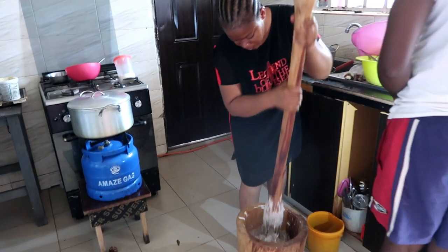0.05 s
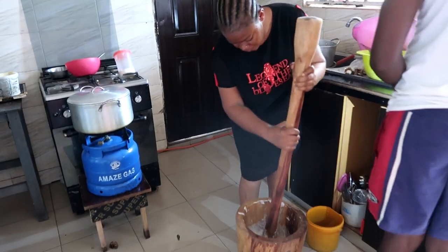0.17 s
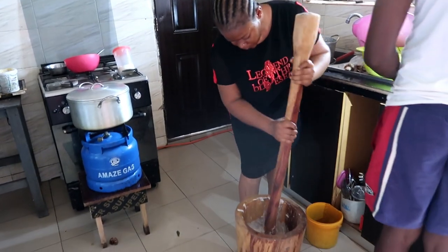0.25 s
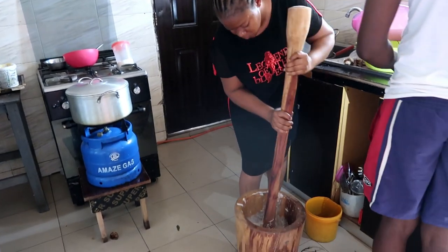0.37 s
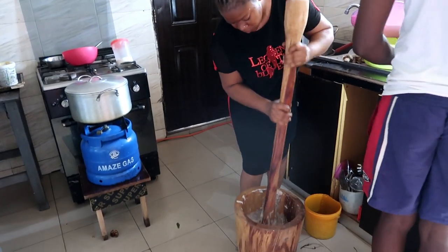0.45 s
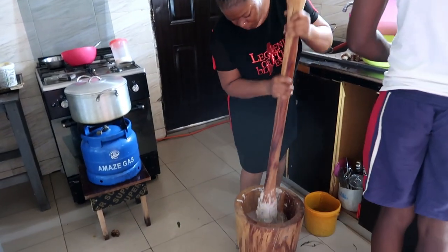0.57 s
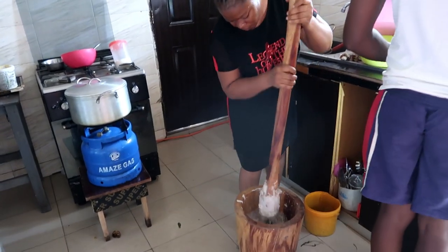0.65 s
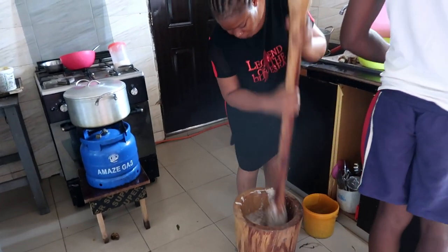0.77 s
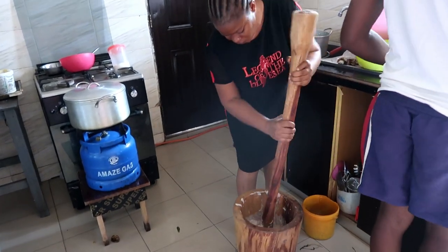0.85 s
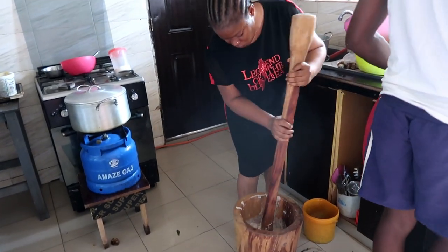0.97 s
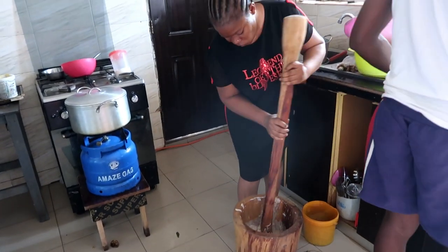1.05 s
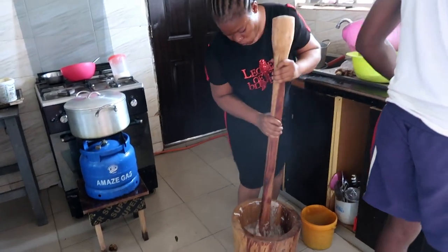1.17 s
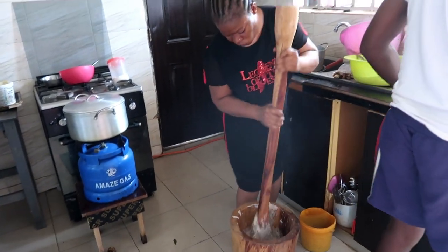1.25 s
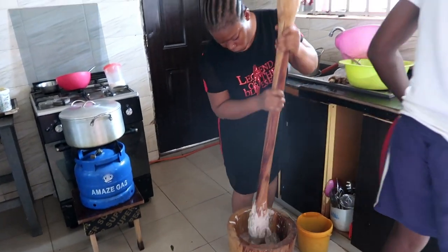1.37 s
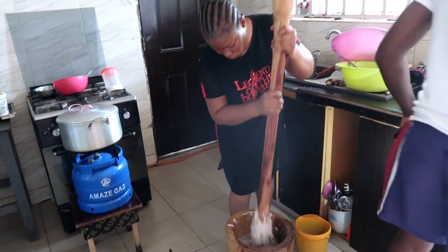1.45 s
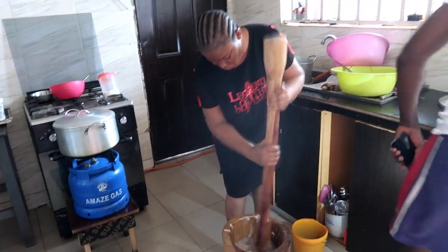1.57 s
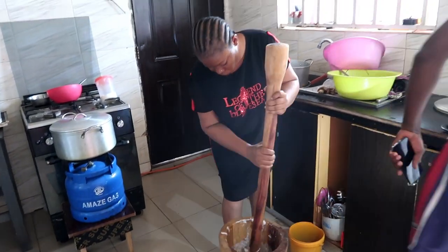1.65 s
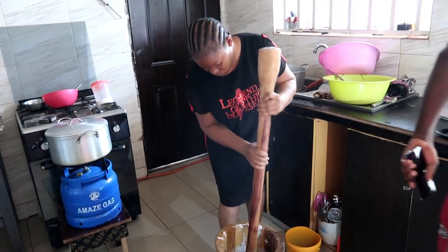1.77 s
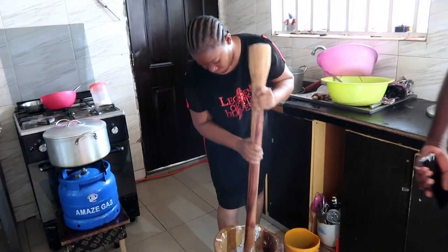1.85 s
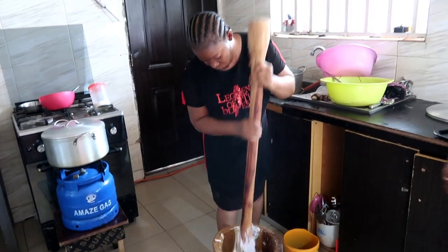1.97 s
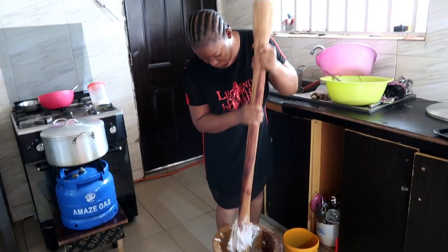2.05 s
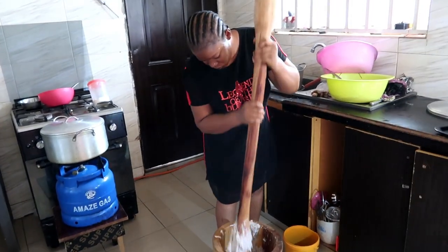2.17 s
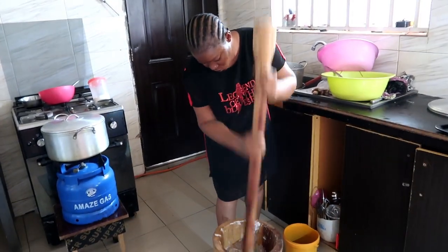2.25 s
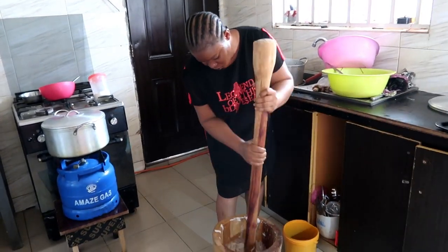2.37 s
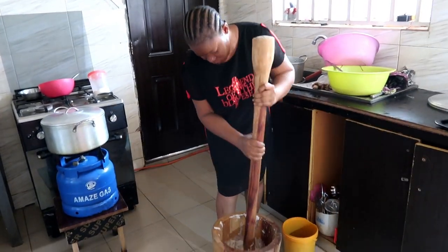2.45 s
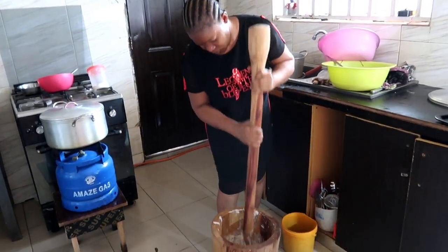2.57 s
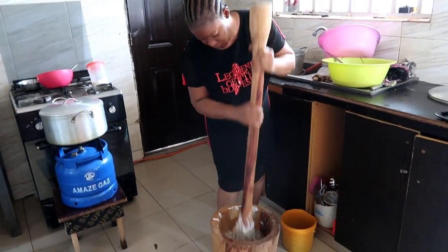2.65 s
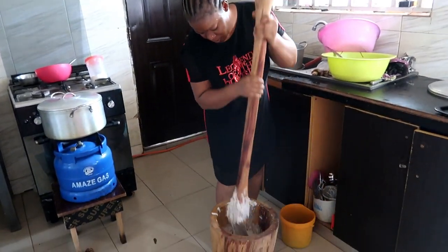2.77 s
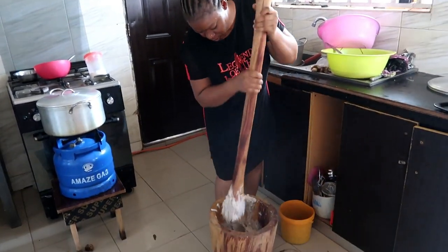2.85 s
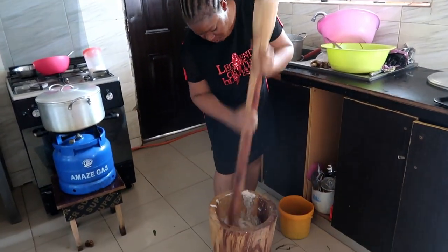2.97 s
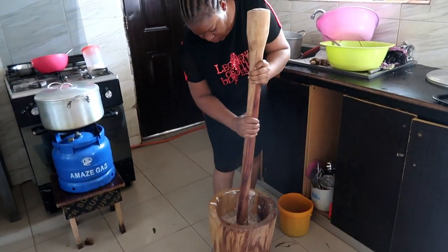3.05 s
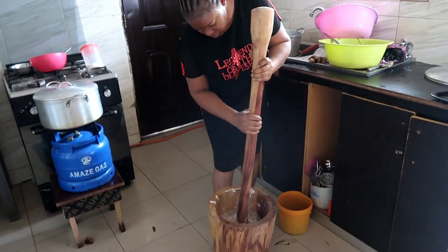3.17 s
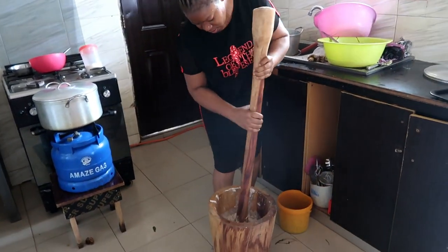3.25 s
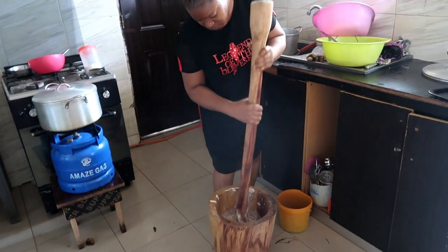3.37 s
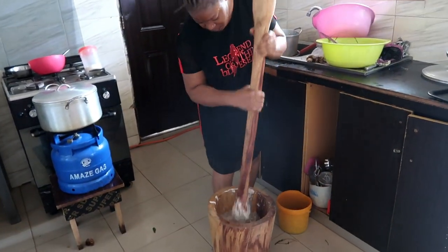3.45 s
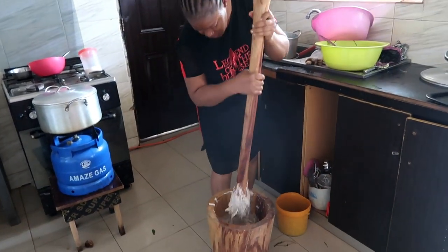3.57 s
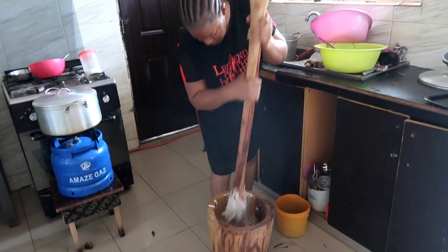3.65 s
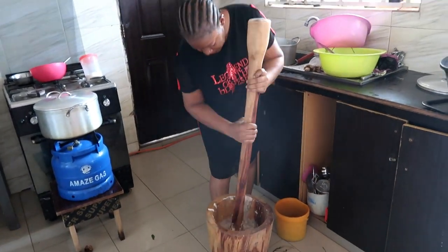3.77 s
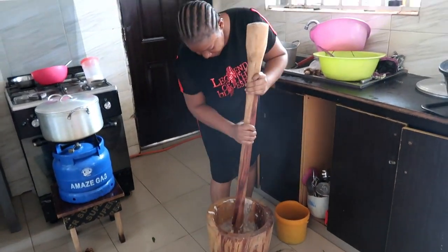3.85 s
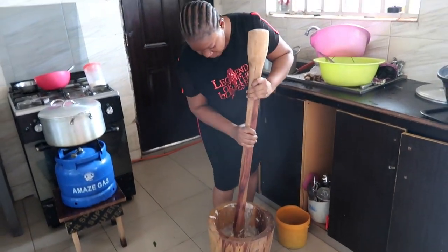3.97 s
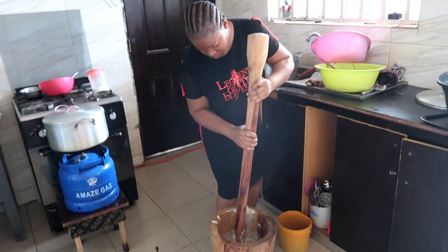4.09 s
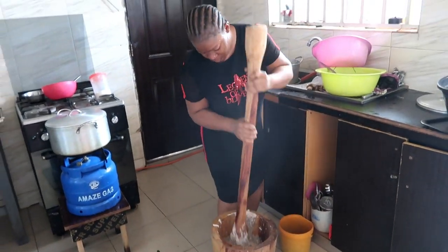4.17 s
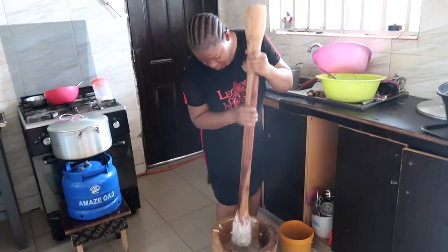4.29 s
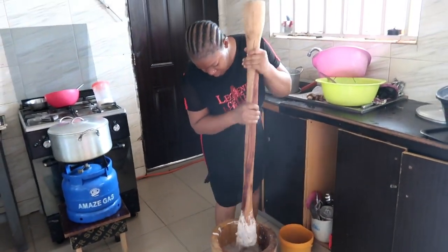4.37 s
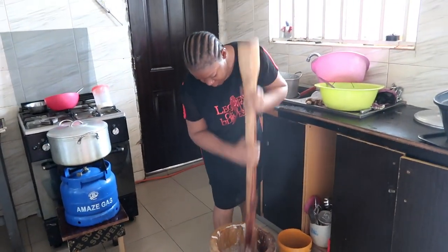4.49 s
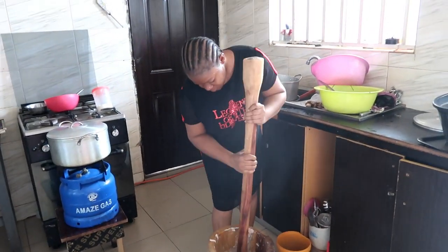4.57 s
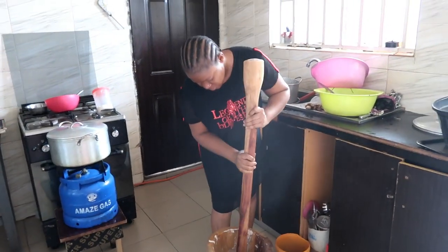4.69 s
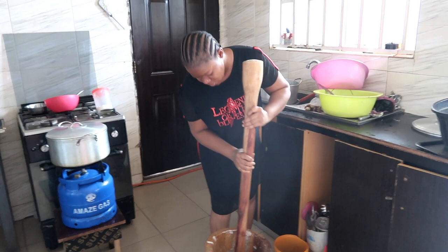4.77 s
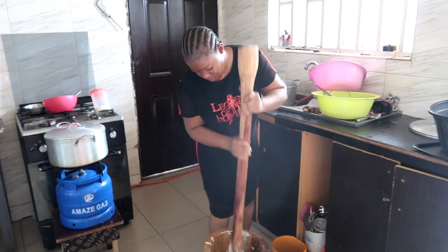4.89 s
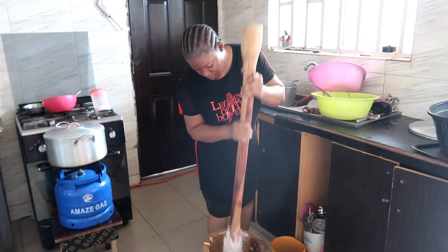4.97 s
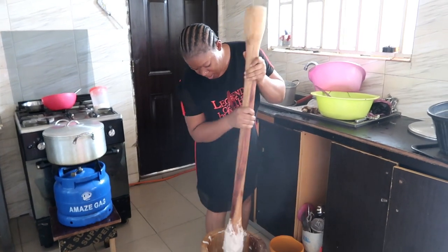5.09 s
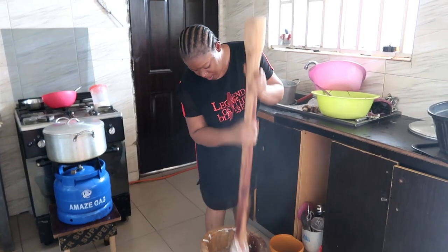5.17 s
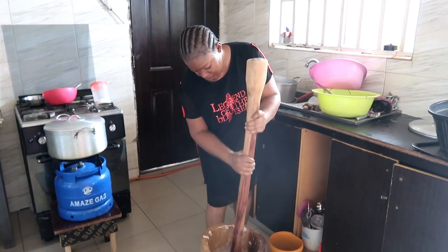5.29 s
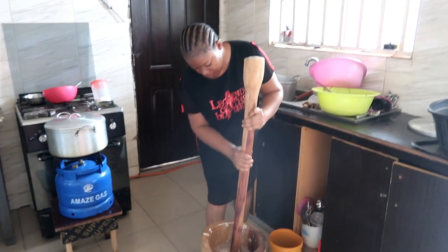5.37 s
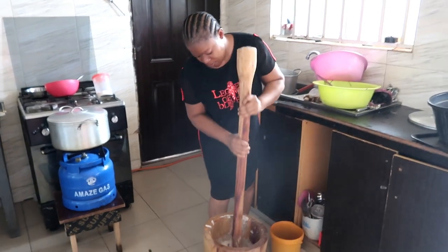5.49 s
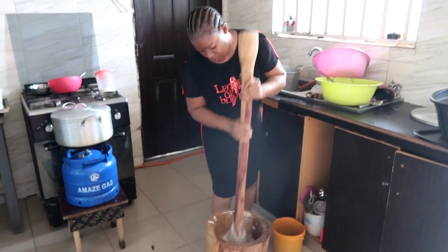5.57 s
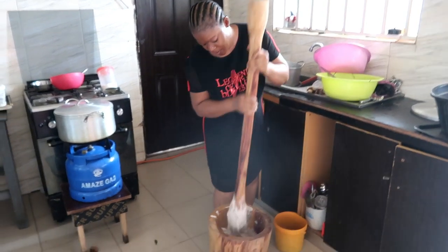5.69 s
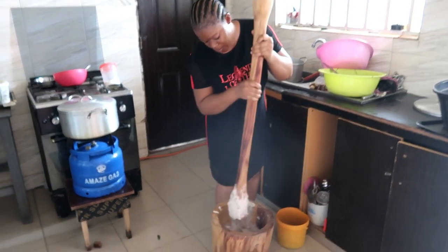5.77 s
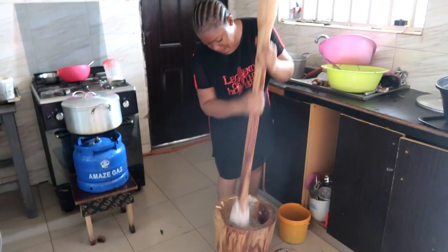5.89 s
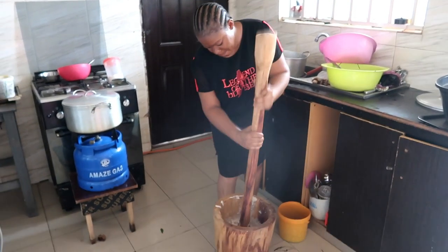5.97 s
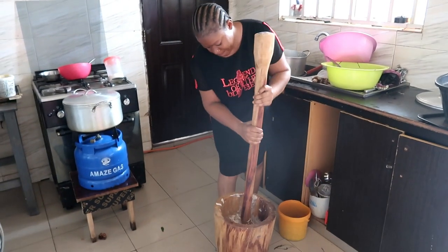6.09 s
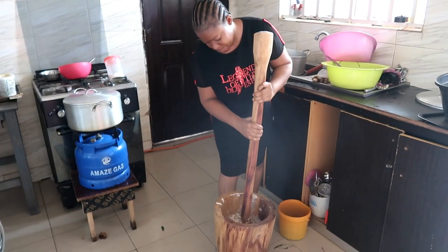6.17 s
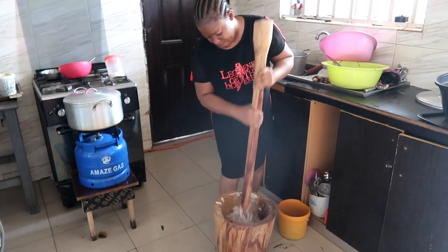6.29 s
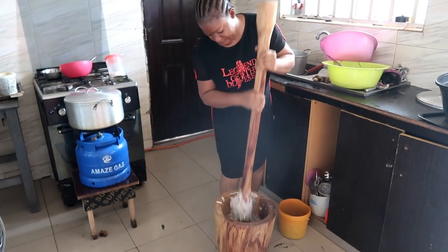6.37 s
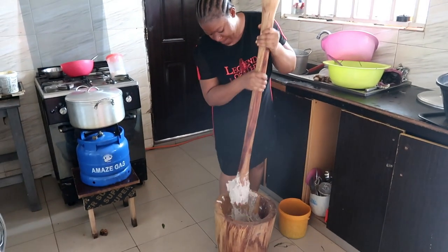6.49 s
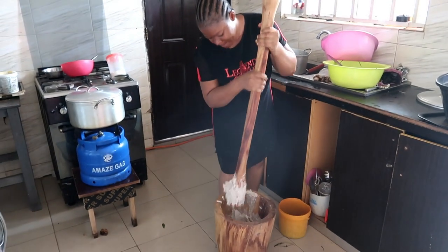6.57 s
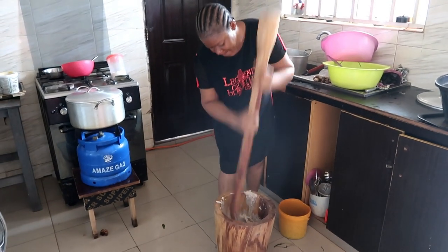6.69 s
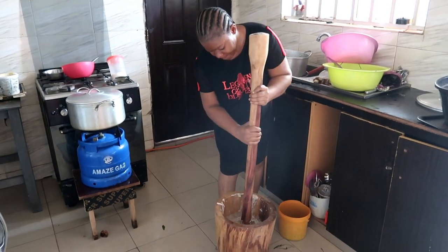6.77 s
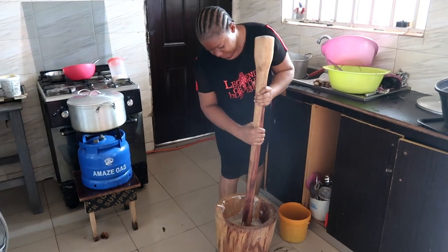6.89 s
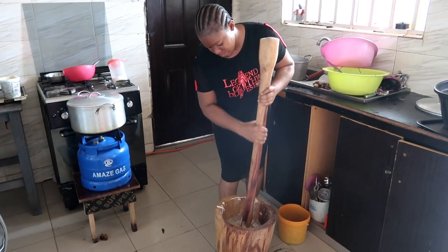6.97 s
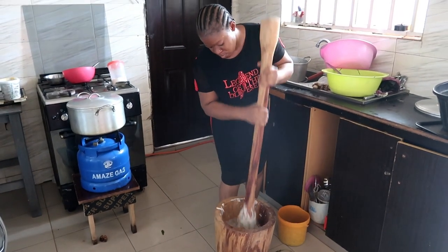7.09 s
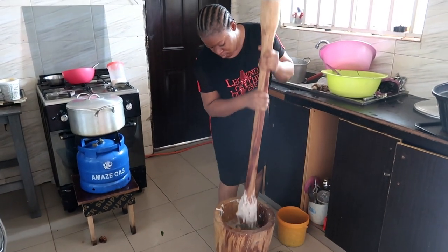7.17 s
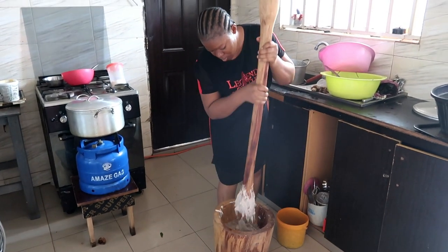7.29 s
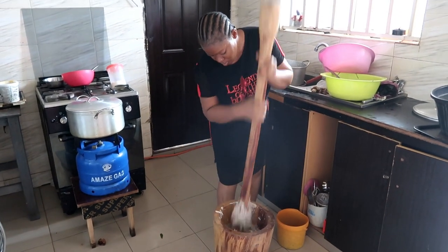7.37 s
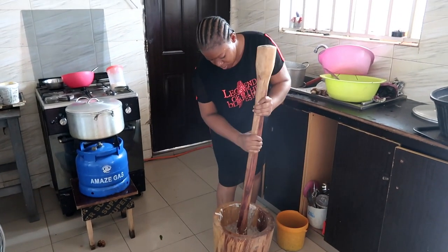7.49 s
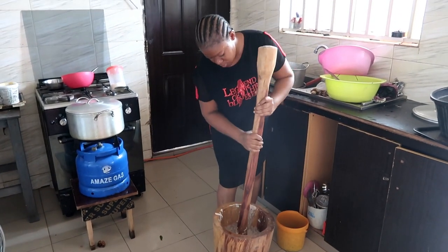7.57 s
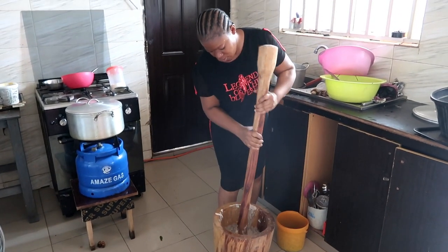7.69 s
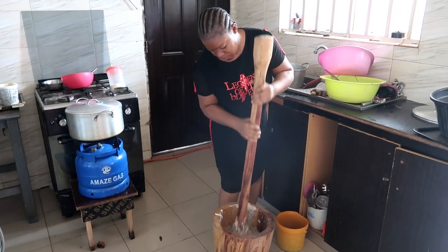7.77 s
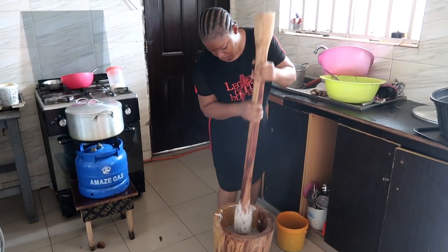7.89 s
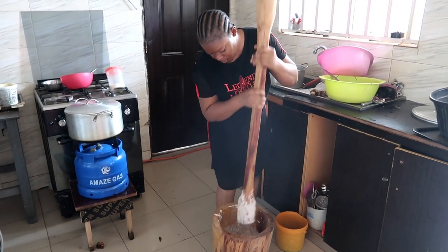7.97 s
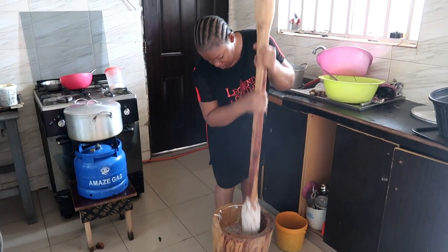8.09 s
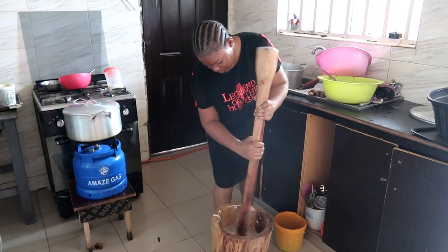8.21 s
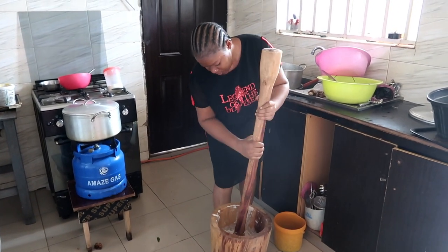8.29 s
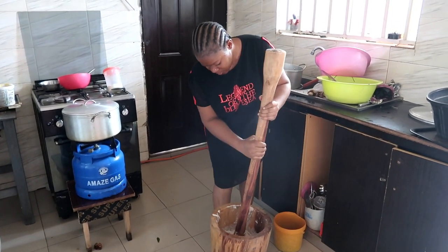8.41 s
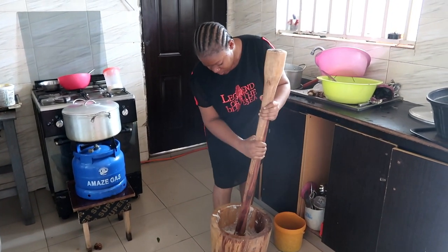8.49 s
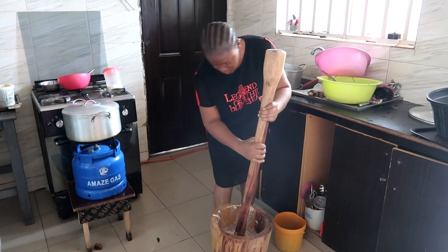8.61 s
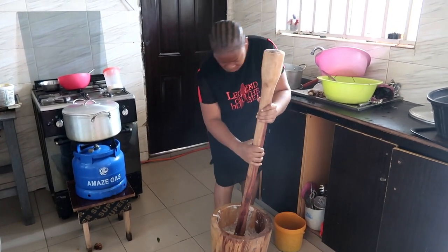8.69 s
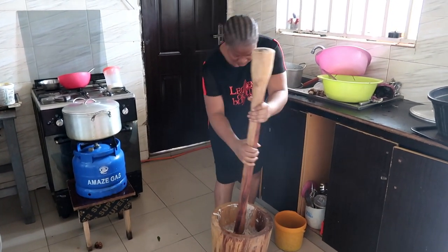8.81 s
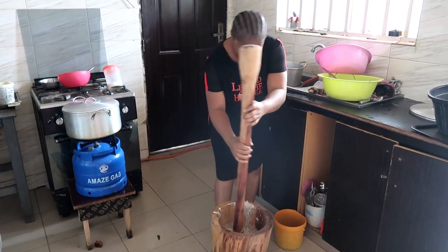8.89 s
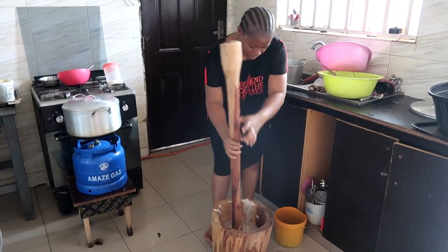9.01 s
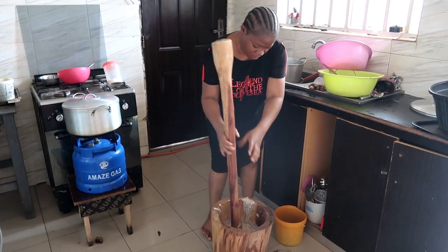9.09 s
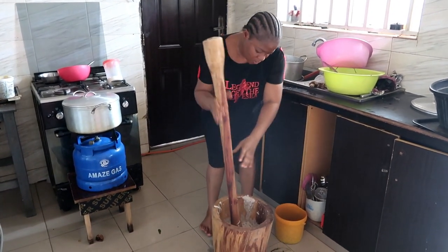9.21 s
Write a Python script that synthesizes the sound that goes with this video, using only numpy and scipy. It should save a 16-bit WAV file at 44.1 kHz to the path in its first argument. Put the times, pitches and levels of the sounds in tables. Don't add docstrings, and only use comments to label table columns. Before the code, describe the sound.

Twelve even pounding strokes of wood into thick paste, each a dull, hollow thud with a sticky slap and squelchy spatter, some doubled by a quick second contact. The mortar hums on briefly and hard tiles return short bright echoes. Gas flame roar fills the gaps, ducking and rising with the phone's automatic gain, heard from two metres; a tiny bird whistle sounds outdoors past the middle.

```python
import sys
import numpy as np
from scipy import signal
from scipy.fft import rfft, irfft
from scipy.io import wavfile
from scipy.ndimage import uniform_filter1d

SR = 44100
rng = np.random.default_rng(int(sys.argv[2]) if len(sys.argv) > 2 else 0)


def dump(signal):
    limited = np.clip(np.atleast_2d(signal).T, -1, 1)
    pcm = np.round(limited * 32767).astype(np.int16)
    wavfile.write(sys.argv[1], SR, pcm)


def amplitude_ratio(level_db):
    exponent = np.asarray(level_db, float) / 20
    return 10 ** exponent


N = 407748
HZ = np.fft.rfftfreq(N, 1 / SR)

# start in seconds, bowl walls in dB, low floor in dB, high floor in dB, singing mode in dB.
STROKES = [(0.222, -9.5, -24, -20.5, -1.5), (0.891, -4, -22.5, -13, -2.5), (1.641, 0.5, -23, -15, -5.5),
           (2.327, -10.5, -47, -27.5, -16), (2.353, -1, -22, -17.5, -5), (3.061, -11, -34, -20.5, -4.5),
           (3.819, -3, -26, -16.5, -3.5), (4.552, -9, -41, -42, -9), (4.591, -6.5, -25.5, -21, -16),
           (5.284, 2.5, -43, -40, -8.5), (5.317, 0, -27, -17, 2), (6.045, -4.5, -31.5, -19.5, -9),
           (6.794, -3.5, -27.5, -12, -24), (7.517, -5, -19, -16.5, -6), (8.268, 2.5, -28.5, -15.5, -3.8)]


def table(rows, hz):
    at, value = np.array(rows).T
    return np.interp(np.log(hz + 1), np.log(at + 1), value)


def gain_db(s):
    # stroke time in seconds, hiss level in dB that the gain settles to.
    ducks = [(0.0, -34.5), (0.2, -35), (0.89, -37), (1.64, -40), (2.36, -45), (3.06, -38.5), (3.82, -35),
             (4.55, -32.5), (5.27, -46.5), (6.04, -41), (6.79, -37), (7.52, -33), (8.24, -44.5)]
    creep_db_per_s, glide_s = 9.5, 0.079
    at, db = np.transpose(ducks)
    drops = creep_db_per_s * np.diff(at) - np.diff(db)
    gain = db[0] + creep_db_per_s * s
    for start, drop_db in zip(at[1:], drops):
        gain = gain - drop_db * (1 - np.exp(-np.maximum(s - start, 0) / glide_s))
    return gain


def band(x, hz, width):
    return signal.lfilter(*signal.iirpeak(hz, hz / width, fs=SR), x)


def add(out, s, sound):
    i = int(s * SR)
    out[i:i + len(sound)] += sound[:N - i] * amplitude_ratio(-gain_db(s))


def walk(rate):
    hold = int(SR / rate)
    steps = np.repeat(rng.standard_normal(N // hold + 1), hold)
    return 0.67 * uniform_filter1d(uniform_filter1d(steps, hold), hold)[:N]


def ring(modes, chance, scatter_db, detune, rise_s):
    t = np.arange(SR) / SR
    hz, db, t60 = np.transpose(modes)[:, :, None]
    spot, bend = chance[:, :len(modes), None]
    tones = np.sin(2 * np.pi * hz * (1 + detune * bend) * t + bend)
    y = (amplitude_ratio(db + scatter_db * spot) * tones * 1000 ** (-t / t60)).sum(axis=0)
    y = y * (1 - np.exp(-t / rise_s))
    return y / np.abs(y).max()


def wet_burst(noise, shape, db, hz, spray_db):
    wet = band(noise[0] * shape, 0.51 * hz, 1.93 * hz)
    wet = band(band(wet, hz, 0.86 * hz), hz, 2.75 * hz)
    spray = band(band(noise[1] * shape, 5700, 3900), 5800, 8200)
    return amplitude_ratio(db) * wet / np.abs(wet).max() + amplitude_ratio(spray_db) * spray / np.abs(spray).max()


def burner():
    # frequency in Hz, level in dB per Hz.
    hiss = [(18, -31), (30, -2), (55, 7), (92, -4.5), (176, 0), (364, 1.5), (881, -1.5), (1370, -12),
            (2080, -10.5), (2490, -18.5), (3150, -16.5), (3500, -21.5), (5730, -30.5), (8470, -37.5),
            (15000, -61.5)]
    # centre in Hz, width in Hz, height over the hiss in dB.
    pot = [(61.3, 130, -5), (1645, 11.6, 14), (2156, 47, 3.5), (3154, 52, 9), (3826, 125, 10),
           (5810, 970, 8)]
    db = table(hiss, HZ)
    for hz, width, over_db in pot:
        db = db + over_db / (1 + (2 * (HZ - hz) / width) ** 2)
    noise = rfft(rng.standard_normal((2, N))) * amplitude_ratio(db)
    out, swell = 0, walk(1.62)
    for hz in 30 * 2. ** np.arange(10):
        share = np.clip(1 - np.abs(np.log2((HZ + 1) / hz)), 0, 1)
        out = out + irfft(noise * share, N) * amplitude_ratio(.5 * swell + 2.33 * walk(9))
    return out / np.sqrt(np.mean(out[0] ** 2)) * amplitude_ratio(-2.5)


def thuds():
    # start in seconds, bowl peak in dB, bowl air in Hz, knock in dB.
    landings = [(0.173, -21.5, 390, -25.5), (0.222, -15.5, 391, -32), (0.25, -20, 340, -28.5),
                (0.856, -18, 378, -28), (0.891, -3, 385, -16), (0.901, -10, 399, -29),
                (1.624, -11, 385, -26), (1.641, 0.9, 381, -11), (2.329, -4.5, 392, -12),
                (2.355, -4.5, 398.6, -23), (2.366, -8, 372, -13), (2.386, -7.5, 356, -38),
                (3.061, -10.5, 386.6, -27.5), (3.764, -22, 293, -23.5), (3.821, -4, 370, -15),
                (4.552, -9, 403, -19.5), (4.589, -6.5, 393, -19), (5.283, 1.3, 409, -11),
                (5.319, -11.5, 378, -12), (6.024, -19.5, 372, -26), (6.045, -7.5, 344.4, -22.5),
                (6.755, -19.5, 358, -28), (6.797, -4.5, 297, -38), (7.463, -28, 310, -29.5),
                (7.517, -8.5, 382, -16.5), (8.242, -8.5, 308, -18), (8.266, -7.5, 380, -12)]
    # frequency in Hz, level in dB, t60 in seconds.
    pestle = [(593, -8, 0.055), (628, -9.5, 0.061), (715.6, 0, 0.058), (811, 1.5, 0.056), (885, -4, 0.041),
              (1068, -0.5, 0.017), (1160, -19.5, 0.043), (1580, -8.5, 0.048), (2100, -11, 0.029)]
    boom_ms = 6.4
    out, t = np.zeros(N), np.arange(SR) / SR
    chance = rng.standard_normal((len(landings), 2, 10))
    u = 1000 * t / boom_ms
    for (s, db, hz, knock_db), c in zip(landings, chance):
        air = np.sin(2 * np.pi * hz * t) + amplitude_ratio(-10) * np.sin(2 * np.pi * 0.625 * hz * t)
        y = amplitude_ratio(db - 3) * air * u * np.exp(1 - u)
        y += amplitude_ratio(knock_db + 3.5) * ring(pestle, c, scatter_db=3, detune=0.031, rise_s=0.0019)
        add(out, s - .002, y)
    return out


def smacks():
    # start in seconds, peak in dB, centre in Hz, spray in dB.
    contacts = [(0.1807, -7.5, 2600, -41), (0.234, -10.5, 3250, -31), (0.2416, -8, 3300, -35),
                (0.8931, -11, 1310, -20.5), (0.8997, -7, 1330, -20), (1.6445, -9, 1620, -27),
                (1.6535, -17, 1550, -33), (1.9429, -25, 1280, -54), (2.3286, -19.5, 1600, -43),
                (2.3563, -11, 1300, -25), (2.362, -10, 1580, -38), (3.0608, -24, 1410, -36.5),
                (3.819, -20.5, 1350, -43), (4.5491, -4.5, 1270, -19), (4.5594, -10, 1380, -23),
                (5.2814, -17, 1820, -44), (5.3177, -18.5, 1370, -50), (6.0412, -30, 1390, -33),
                (6.789, -17, 1450, -34), (7.1504, -49, 2020, -37), (7.5213, -15, 1700, -28),
                (8.2442, -15, 2200, -28), (8.2516, -13, 2600, -14), (8.2654, -4.5, 2450, -16)]
    rise_s, decay_ms = 0.00077, 1.77
    out, t = np.zeros(N), np.arange(6000) / SR
    shape = np.minimum(t / rise_s, 1) * np.exp(-1000 * t / decay_ms)
    for s, db, hz, spray_db in contacts:
        noise = rng.standard_normal((2, 6000))
        add(out, s - .0003, wet_burst(noise, shape, db + 0.2, hz, spray_db + 2.5))
    return out


def spatters():
    # start in seconds, peak in dB, centre in Hz, spray in dB, share thrown at the walls in dB.
    squeezes = [(0.182, -1, 2310, -42, -0.5), (0.2418, -11, 3370, -30, -8), (0.8897, -13.5, 1283, -32, 5.5),
                (0.9031, -10, 2900, -33, -3), (1.6082, -17, 1560, -24, -3.5), (1.6415, -4.5, 1630, -34, -1),
                (1.654, -8.5, 2820, -36, -0.5), (2.316, -13, 1100, -37, -1.5),
                (2.3623, -11, 2120, -27, 2.5), (3.0597, -19.5, 1356, -25.5, -1),
                (3.768, -22.5, 1740, -56, -9), (3.8158, -16.5, 1280, -37, -15), (4.548, -7.5, 1670, -16, 6),
                (5.2837, -22.5, 2046, -47, 4), (5.3187, -22, 1370, -51, 6), (6.01, -27, 2800, -32, 4.5),
                (6.04, -13, 1510, -30, -7.5), (6.7454, -22, 1520, -53, 7), (6.789, -9, 1530, -17, -3),
                (7.471, -21, 2050, -41, -11), (7.5159, -10, 1220, -37, 2), (7.8994, -27, 2110, -50, 4.5),
                (8.2326, -8, 2680, -17, 10), (8.2442, -1.5, 2000, 1, -12.5)]
    full_ms, ms_per_db = 9.4, 0.54
    near, far, t = np.zeros(N), np.zeros(N), np.arange(6000) / SR
    for s, db, hz, spray_db, far_db in squeezes:
        noise = rng.standard_normal((3, 6000))
        decay = np.exp(-1000 * t / (full_ms - ms_per_db * db))
        pockets = amplitude_ratio(3 * noise[2])
        shape = (1 - np.exp(-t / .003)) * decay * pockets
        y = wet_burst(noise, shape, db - 5.5, hz, spray_db - 6.5)
        add(near, s - .001, y)
        add(far, s - .001, amplitude_ratio(far_db) * y)
    return near, far


def sinking():
    sink_db, swell_ms, fall_ms = -27, 12, 3
    out, t = np.zeros(N), np.arange(6000) / SR
    swell = np.exp(-1000 * np.abs(t - .06) / np.where(t < .06, swell_ms, fall_ms))
    for s, db, *_ in STROKES:
        noise = rng.standard_normal((2, 6000))
        add(out, s - .062, wet_burst(noise, swell, db + sink_db, 1700, db + sink_db - 11))
    return out


def after_ring():
    # frequency in Hz, width in Hz, level in dB.
    bowl = [(201, 44, -7), (260, 61, -1), (316, 74, -1.5), (377.3, 22, 1.5), (422, 32, -9.5),
            (500, 23, -18), (796, 102, -17.5), (1380, 310, -24.5)]
    # frequency in Hz, level in dB, t60 in seconds.
    floor_low = [(63.65, -17.5, 1.64), (74.9, -18, 1.18)]
    floor_high = [(116.8, -9, 0.47), (129, -17.5, 0.98)]
    sing_hz, bowl_t60_s = 364, 0.56
    out, t = np.zeros(N), np.arange(SR) / SR
    sing = np.sin(2 * np.pi * sing_hz * t) * np.exp(t / 0.4)
    decay = (1 - np.exp(-t / 0.0076)) * 1000 ** (-t / bowl_t60_s)
    for s, db, low_db, high_db, sing_db in STROKES:
        c, noise = rng.standard_normal((2, 2, 10)), rng.standard_normal(SR)
        walls = sum(amplitude_ratio(d) * band(band(noise, hz, w), hz, 2 * w) for hz, w, d in bowl)
        walls = walls / walls.std() + amplitude_ratio(sing_db) * sing
        y = amplitude_ratio(db - 8.5) * walls * decay
        y += amplitude_ratio(low_db) * ring(floor_low, c[0], scatter_db=5, detune=0.013, rise_s=0.0042)
        y += amplitude_ratio(high_db) * ring(floor_high, c[1], scatter_db=-5, detune=0.04, rise_s=0.0016)
        add(out, s - .002, y)
    return out


def kitchen(x):
    # frequency in Hz, t60 in seconds.
    room = [(500, 0.64), (900, 0.69), (2400, 0.47), (6400, 0.76), (12000, 0.2)]
    t, tails = np.arange(SR) / SR, 0
    for hz in 500 * 2 ** np.arange(0, 5, .5):
        echoes = band(rng.standard_normal((2, SR)), hz, hz / 3) * 1000 ** (-t / table(room, hz))
        energy = np.sum(echoes ** 2, axis=1, keepdims=True)
        tails = tails + echoes * np.sqrt(hz / SR / energy)
    tails = tails * np.clip(t / 0.0046 - .25, 0, 1)
    return signal.fftconvolve(x[None], tails, axes=1)[:, :N]


def bird():
    # time in seconds, pitch in Hz, level in dB.
    whistle = [
        (5.83, 4610, -68),
        (5.845, 4863, -76),
        (5.858, 4820, -62),
        (5.972, 4633, -69),
        (5.98, 4684, -73),
    ]
    s, hz, db = np.transpose(whistle)
    out, t = np.zeros(N), np.arange(s[0], s[-1], 1 / SR)
    tone = np.sin(2 * np.pi * np.cumsum(np.interp(t, s, hz)) / SR)
    level = amplitude_ratio(np.interp(t, s, db) + 1 + 4 * walk(60)[:len(t)])
    add(out, s[0], level * np.hanning(len(t)) ** 0.304 * tone)
    return out


def phone_ports(mid, diffuse):
    # frequency in Hz, side minus mid in dB.
    side_curve = [(60, -29.5), (110, -31), (200, -23.5), (380, -18.5), (700, -22), (1290, -14.5),
                  (2380, -10.5), (4400, -4.5), (8120, 3.5), (15000, 6.5)]
    share, angle = .55, 1.87
    lagged = share * np.exp(-1j * angle) * rfft(mid)
    unrelated = np.sqrt(1 - share ** 2) * rfft(diffuse)
    side = irfft(amplitude_ratio(table(side_curve, HZ)) * (lagged + unrelated), N)
    return np.array([mid + side, mid - side])


def scene():
    # frequency in Hz, response in dB.
    mic = [(40, -12), (60, 0), (5000, 0), (8000, -6), (11000, -9), (15000, -14)]
    hiss, knocks = burner(), thuds()
    near, far = spatters()
    direct = knocks + smacks() + near + sinking() + after_ring()
    to_walls = amplitude_ratio(-1.5) * knocks + far
    hits, sent = irfft(rfft([direct, to_walls]) * amplitude_ratio(table(mic, HZ)), N)
    echoes = amplitude_ratio(0.5) * kitchen(sent)
    hits = hits + bird()
    mid = hits + echoes[0] + hiss[0]
    scatter = rfft(rng.standard_normal(256) * np.hanning(256), N)
    scattered = irfft(rfft(hits) * scatter / np.abs(scatter), N)
    return phone_ports(mid, scattered + echoes[1] + hiss[1])


def top_cut(x):
    return signal.sosfilt(signal.butter(12, 15670, fs=SR, output="sos"), x)


def record(dry):
    levelled = dry * amplitude_ratio(gain_db(np.arange(N) / SR))
    return top_cut(np.clip(levelled, -1, 1))


dry = scene()
out = record(dry)
dump(out)
```